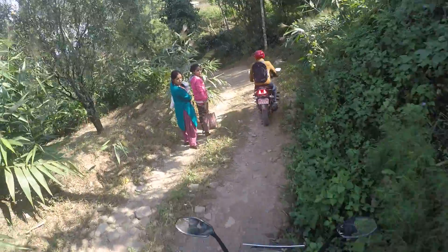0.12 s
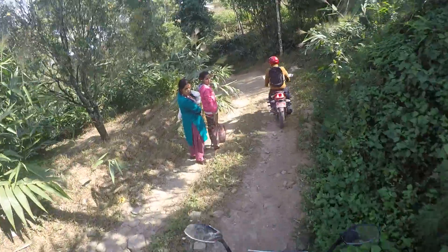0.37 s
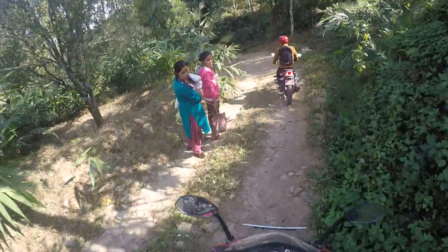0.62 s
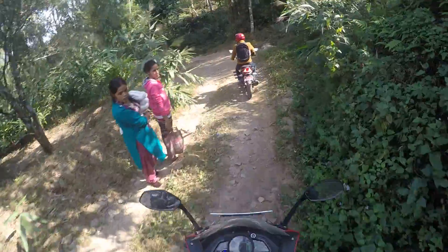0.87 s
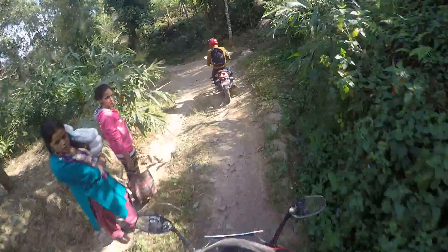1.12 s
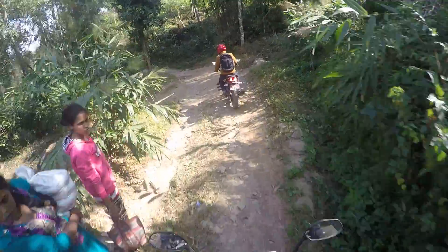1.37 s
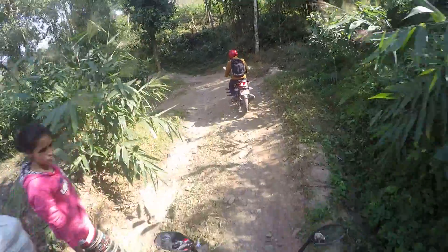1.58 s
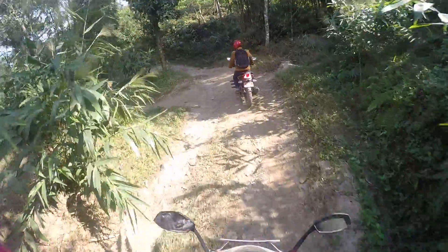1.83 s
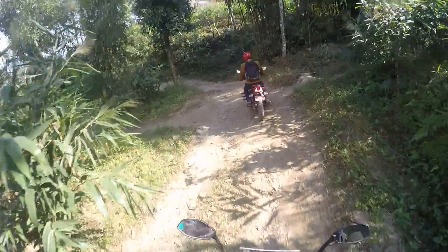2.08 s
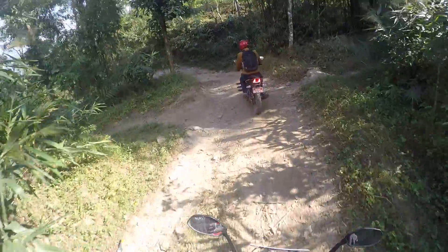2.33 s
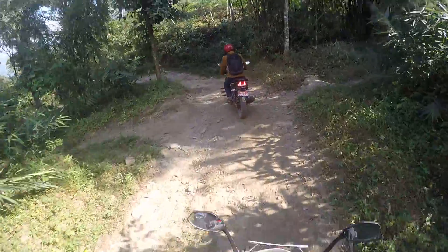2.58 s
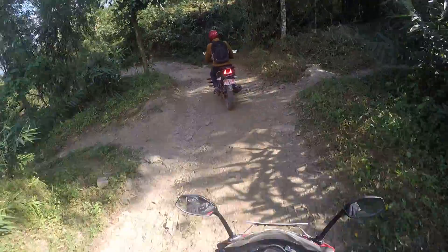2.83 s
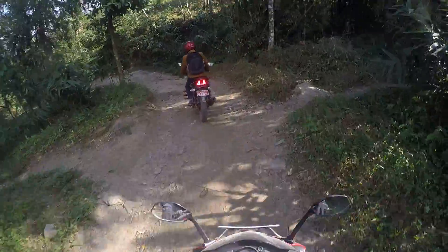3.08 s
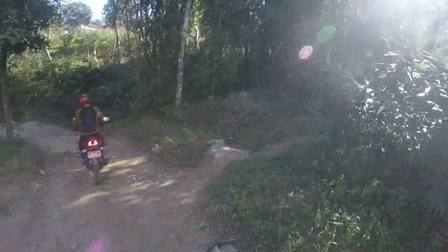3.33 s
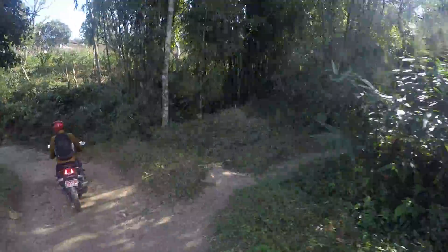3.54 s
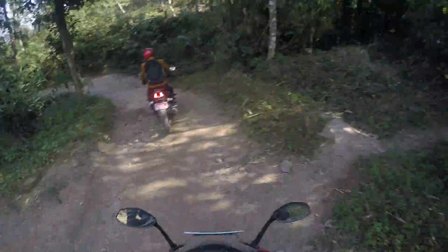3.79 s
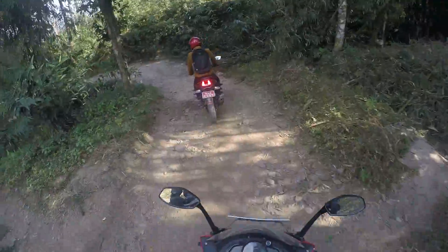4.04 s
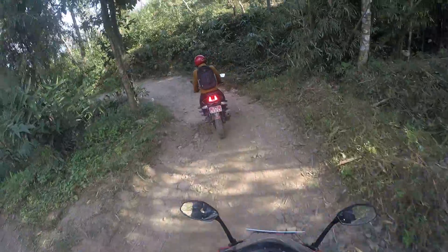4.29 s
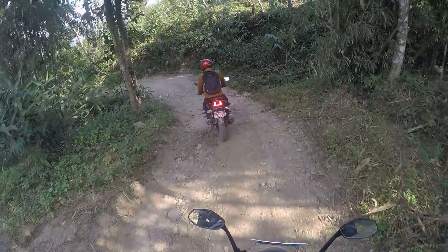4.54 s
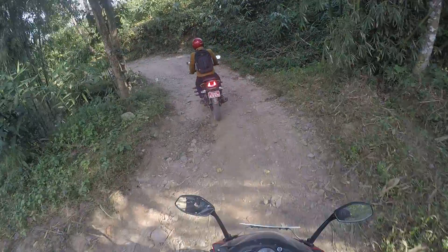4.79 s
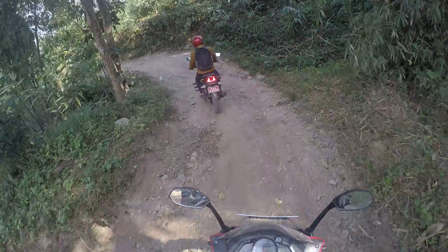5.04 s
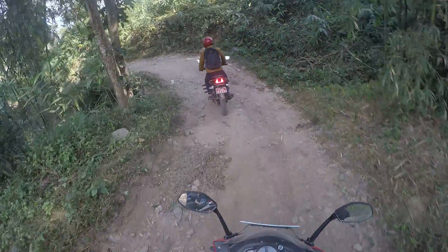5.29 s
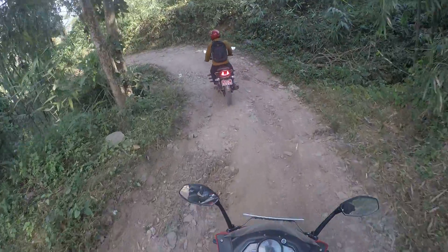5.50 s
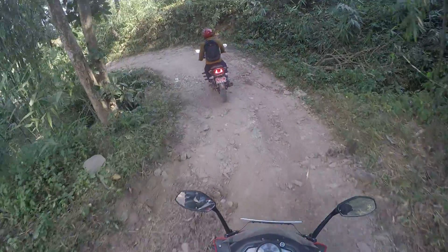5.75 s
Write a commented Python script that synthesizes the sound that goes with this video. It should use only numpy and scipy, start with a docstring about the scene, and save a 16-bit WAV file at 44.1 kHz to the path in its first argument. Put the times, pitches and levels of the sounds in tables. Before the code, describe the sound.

Heard from a slowly ridden motorcycle on a dirt track: low-frequency jolts, soft engine growl, valve ticks, brief panel hums and a few knocks.

```python
"""On a rough dirt track, a small single-cylinder motorcycle creeps along behind another one.
The microphone rides with it, sealed in a camera housing: bumps shake the mount below about 50 Hz.
The rider's engine is noise swelling on each crank turn, coloured by the housing, with ringing valve ticks.
Panels hum, thin metal sings, and things knock and scrape the housing. The exhaust some way ahead
thumps softly as pulsed pipe resonances, over microphone hiss and a faint pulsing electronic whine."""
import sys
import numpy as np
from scipy import signal
from scipy.fft import rfft, irfft
from scipy.io import wavfile

SR = 44100
rng = np.random.default_rng(int(sys.argv[2]) if len(sys.argv) > 2 else 0)


def boost_factor(decibels):
    """Convert a level in decibels to a linear amplitude factor."""
    exponent = np.asarray(decibels, float) / 20
    return 10 ** exponent


def materialize(psi):
    """Save the field psi as 16-bit PCM at rate SR to the path in sys.argv[1].

    A 1-D psi becomes a single channel; in a 2-D psi each row is a channel.
    """
    bounded = np.clip(np.atleast_2d(psi).T, -1, 1)
    quanta = np.round(bounded * 32767).astype(np.int16)
    wavfile.write(sys.argv[1], SR, quanta)


N = 259308
TIME = np.arange(N) / SR   # s

# roughness of the ground, as sway of the mount: (time [s], level [dB])
GROUND_SWAY = [(0, -31.5), (.22, -35), (.38, -32), (.75, -27), (.9, -34), (1.0, -34.5), (1.15, -20.5),
               (1.5, -28), (1.62, -32.5), (1.8, -25.5), (2.22, -22.5), (2.32, -32.5), (2.45, -28),
               (2.7, -23.5), (3.15, -24.5), (3.38, -25), (3.5, -31), (3.7, -39), (3.85, -34.5),
               (4.3, -37.5), (5.05, -39), (5.25, -44.5), (5.88, -36.5)]
# jolts from bumps, before the camera's filter: (time [s], peak [dB], swing [Hz], ringing that follows [dB])
BUMP_JOLTS = [(0.116, -23.5, 33.3, -22), (.171, -19, 33.3, -45), (.302, -18.5, 24.6, -46),
              (0.475, -5, 27.7, -16), (0.842, -19, 27.4, -48), (.94, -31.5, 28, -41),
              (1.066, -23.5, 25.2, -45), (1.184, -6.5, 26, -26), (1.348, -15.5, 27.2, -28),
              (1.519, -22.5, 30.2, -33), (1.696, -12, 28.3, -24), (1.747, -21, 26, -50),
              (1.804, -8, 22.5, -47), (1.942, -15.5, 24.7, -24.5), (2.062, -15, 28.4, -19),
              (2.2, -14, 27.8, -42), (2.527, -5.5, 23.4, -17.5), (2.655, -12.5, 24, -48),
              (2.921, -18, 23.8, -49), (3.012, -14.5, 21.7, -28.5), (3.16, -16.5, 28.7, -31),
              (3.378, -14.5, 22.8, -56), (3.802, -25.5, 29, -45), (3.921, -23, 24.2, -48),
              (4.456, -24, 23.4, -46), (4.846, -27, 22, -53), (5.146, -26.5, 30, -35),
              (5.21, -24, 22.1, -57), (5.264, -20.5, 23.3, -65), (5.511, -26.5, 24.4, -42),
              (5.564, -24, 24.2, -49), (5.614, -19.5, 20.2, -39)]
# the rider's own engine: (time [s], speed [crank turns/s])
CRANK_SPEED = [(0.0, 15.95), (0.2, 15.16), (0.6, 21.99), (1.0, 24.54), (1.4, 19.97), (1.8, 20.33),
               (2.0, 22.21), (2.4, 21.48), (2.6, 22.43), (3.0, 23.08), (3.3, 19.47), (3.8, 19.36),
               (4.1, 19.95), (4.55, 14.13), (5.0, 16.83), (5.6, 15.81), (5.9, 13.76)]
# engine load, heard as mechanical noise; its swing about the mean is used: (time [s], level [dB])
ENGINE_LOAD = [(0, -58), (.28, -57.5), (.45, -53), (.65, -52), (.9, -50.5), (1.1, -52), (1.3, -54.5),
               (1.5, -54.5), (1.95, -53.5), (2.45, -55.5), (2.8, -54), (3.2, -55), (3.6, -58.5),
               (3.92, -54.5), (4.5, -59), (5.0, -55.5), (5.4, -56.5), (5.88, -57.5)]
# resonances of the camera housing: (centre [Hz], half width [Hz], relative level [dB])
HOUSING_MODES = [(863, 25, -9.5), (1010, 71, -2), (1086, 43, 0), (1249.4, 67, 3.5), (1411, 63, 0),
                 (1630, 102, -9)]
# relative spectrum of the growl: (frequency [Hz], level [dB per Hz])
GROWL_SPECTRUM = [(76, -30), (130, -2), (161, -8.5), (232, -6.5), (341, -12), (423, -17.5), (529, -40),
                  (617, -11.5), (765, -18), (820, -35), (1070, -36), (1800, -120)]
# relative spectrum of the metal noise: (frequency [Hz], level [dB per Hz])
CLATTER_SPECTRUM = [(1060, 0.5), (1800, -2), (2030, -3.5), (2340, 4), (2550, 2), (2970, 3.5), (3180, -1),
                    (3550, 1.5), (3830, -3), (4210, 0.5), (6310, -12.5), (7020, -10), (8000, -19.5),
                    (10400, -21), (17600, -120)]
# thin metal parts sing for a moment: (time [s], half length [s], centre [Hz], level before a 2 dB cut [dB])
METAL_SINGS = [(2.85, .1, 5000, -68), (3.09, 0.079, 4300, -61), (3.24, 0.066, 4350, -68),
               (5.66, 0.41, 5040, -68), (.8, 0.19, 4200, -62), (2.78, .05, 5650, -70),
               (2.95, 0.27, 7000, -78), (3.8, .07, 4150, -68), (4.0, 0.23, 6950, -76),
               (4.2, 0.11, 4200, -65), (4.3, .15, 5020, -73), (5.0, 0.49, 4250, -70.5),
               (5.27, 0.028, 6900, -73)]
# resonances of the own exhaust pipe: (frequency [Hz], relative level [dB], t60 [s])
OWN_PIPE_MODES = [(64, 13, 0.058), (85.8, 8, 0.16), (108, 4.5, 0.1), (201, -4, 0.056), (233.7, -5, 0.18),
                  (289.6, -10, 0.26)]
# valve ticks: (time [s], level before a 5.5 dB cut [dB], even turns over odd [dB], 3 kHz over the rest [dB])
TICK_LEVELS = [(0, -67, -3, 3), (.27, -69, 0, 2), (.32, -61, 0, 4), (.47, -59, 0, 2), (.55, -58.5, 0, -2),
               (.9, -57.5, -2, -1), (1.05, -68, 0, -2), (1.32, -64, 3, 0), (1.6, -66, -5, 0),
               (2.0, -65, 0, 0), (2.5, -70, -3, -2), (3.2, -63, -2, 0), (3.6, -69, -5, 0),
               (3.95, -62, -3, -1), (4.12, -65, 1, -2), (4.3, -62, 4, 0), (4.9, -63, 5, 0),
               (5.15, -65, 3, -1), (5.35, -62, 4, 1), (5.6, -63, 2, 0), (5.88, -61.5, 0, 0)]
# single ticks that land harder: (time [s], extra level [dB])
HARDER_TICKS = [(3.22, 4), (4.695, 2), (5.312, 4)]
# valve gear: (frequency [Hz], relative level [dB], t60 of one pass [s])
VALVE_MODES = [(1245, -6, .03), (2380, -7, .014), (2720, -5, .014), (3000, 0, .018), (3380, -7, .011),
               (4160, -7, .011), (5070, -10, .013), (5750, -14, .014), (6900, -19, .012)]
# a panel hums at certain moments: (start [s], length [s], start pitch [Hz], end pitch [Hz], nominal level [dB])
PANEL_HUMS = [(0.529, 0.3, 1010, 1044, -50.5), (0.857, 0.2, 1037, 1015, -58.5),
              (1.795, 0.18, 1028, 1040, -47), (2.173, 0.14, 1000, 1001, -49.5),
              (2.44, 0.25, 1244, 1246, -49.5), (2.462, 0.28, 987, 1010, -47.5),
              (2.793, 0.049, 1043, 1014, -41.5), (2.896, 0.034, 1047, 1020, -54),
              (0.238, 0.12, 1273, 1294, -53), (0.402, .05, 1257, 1250, -56),
              (0.535, 0.089, 1285, 1260, -54), (.8, 0.035, 1243, 1235, -54),
              (0.888, 0.092, 1222, 1240, -47), (0.926, 0.076, 1427, 1415, -54.5),
              (3.06, 0.039, 1240, 1252, -53)]
# something strikes the housing: (time [s], peak [dB], contact [s], second touch after [s])
HOUSING_KNOCKS = [(1.324, -36, 0.0002, 0.00315), (3.967, -49, 0.00029, 0.00305),
                  (4.696, -41, 0.00044, 0.00364), (4.897, -17, 0.001, 0.004875),
                  (4.983, -43, 0.00022, 0.0034)]
# the struck housing: (frequency [Hz], relative level [dB], t60 [s])
SHELL_MODES = [(458, -16, 0.012), (670, -15, 0.014), (702, -15, 0.096), (972, 3.5, 0.022), (1101, 7, 0.042),
               (1285, 5.5, 0.016), (1620, 3, 0.014), (2350, 3, 0.012), (4200, -42, .01)]
# the engine ahead: (time [s], firing rate [firings/s])
AHEAD_FIRINGS = [(0.0, 13.82), (0.5, 13.46), (1.0, 13.11), (1.5, 12.81), (2.0, 12.65), (2.5, 12.77),
                 (3.0, 13.37), (3.5, 14.22), (4.0, 14.13), (4.5, 13.4), (5.0, 14.03), (5.5, 14.48),
                 (6.0, 13.66)]
# exhaust ahead, nearer or under more throttle: (time [s], level of its thumps [dB])
AHEAD_LEVELS = [(0, -58.5), (.45, -43.5), (.56, -46), (.75, -59), (1.02, -50), (1.1, -66), (1.3, -46),
                (1.6, -54), (2.4, -53.5), (2.7, -45), (3.4, -48), (4.15, -51.5), (4.85, -49.5), (5.15, -50),
                (5.88, -54)]
# resonances of the exhaust pipe ahead: (frequency [Hz], relative level [dB], t60 [s])
AHEAD_PIPE_MODES = [(66.6, -1.2, 0.19), (81.3, -0.93, 0.25), (110, -0.32, 0.16)]
# relative spectrum of the microphone hiss: (frequency [Hz], level [dB])
HISS_SPECTRUM = [(3530, -50), (6000, -18), (6970, -9), (9260, -13), (10600, -11.5), (10800, -12.5),
                 (13400, -13.5), (15000, -16.5)]
# whine of the camera electronics: (frequency [Hz], rms level [dB])
WHINE_TONES = [(10261.72, -87), (10285.7, -85.5), (10309.68, -91), (10357.64, -97)]


def rms_one(x):
    """Scales a signal to rms 1."""
    return x / np.sqrt(np.mean(x ** 2) + 1e-20)


def in_time(rows):
    """Draws each column of a time table as a line over all samples."""
    s, *columns = np.transpose(rows)
    return [np.interp(TIME, s, column) for column in columns]


def coloured(gain_at):
    """White noise shaped by a gain for each frequency; rms 1."""
    hz = np.arange(1, N // 2 + 2) * SR / N
    return rms_one(irfft(rfft(rng.standard_normal(N)) * gain_at(hz), N))


def spectrum(points):
    """Gain that joins the points of a spectrum on a log frequency axis."""
    hz, level_db = np.transpose(points)
    return lambda f: boost_factor(np.interp(np.log(f), np.log(hz), level_db))


def peak(hz, half_width):
    """Gain of a resonance passed twice: steep flanks, 6 dB down at the half width."""
    return lambda f: 1 / (1 + ((f - hz) / half_width) ** 2)


def drift(rate_hz):
    """Random wander below roughly the given rate; rms 1."""
    return coloured(peak(0, rate_hz))


def ring(x, modes):
    """Every mode rings after the excitation, neighbours in opposite sign."""
    out = 0
    for k, (hz, level_db, t60) in enumerate(modes):
        radius = boost_factor(-60 / (t60 * SR))
        w = 2 * np.pi * hz / SR
        resonator = [1, -2 * radius * np.cos(w), radius * radius]
        out = out + (-1) ** k * boost_factor(level_db) * signal.lfilter([0, np.sin(w)], resonator, x + 1e-18)
    return out


def turns(rate_table, start):
    """Running count of turns, begun a fraction of a turn in."""
    return start + np.cumsum(in_time(rate_table)[0]) / SR


def once_per_turn(turn, spread_db):
    """A click at every whole turn, each with its own strength."""
    whole = np.floor(turn).astype(int)
    strength = boost_factor(spread_db * rng.standard_normal(200))
    return np.diff(whole, prepend=whole[0]) * strength[whole]


def level_by_engine(level_db, load_share, db_per_turn):
    """Gain from a level at mean load and 19.5 turns/s, a share of the load's swing and dB per extra turn/s."""
    load_db, = in_time(ENGINE_LOAD)
    load_swing_db = load_share * (load_db - load_db.mean())
    return boost_factor(level_db + load_swing_db + db_per_turn * (in_time(CRANK_SPEED)[0] - 19.5))


def swell_and_fade(start, length):
    """Envelope that rises exponentially over 40 ms, holds, and fades over 30 ms."""
    rise = np.minimum(TIME - start, 0) / 0.04
    fade = np.maximum(TIME - start - length, 0) / 0.03
    return np.exp(rise - fade)


def mount():
    """Bumps pull the membrane back in one short swing and leave the mount ringing; between them it sways."""
    ground_db, = in_time(GROUND_SWAY)
    # ringing between jolts follows 0.71 of the ground's swing
    ringing = boost_factor(-37.5 + 0.71 * (ground_db - ground_db.mean()))
    rise_s, fall_s = 0.05, 0.11
    for s, _, _, ring_db in BUMP_JOLTS:
        after = np.clip(TIME - s, 0, 9)
        ringing = ringing + boost_factor(ring_db) * (1 - np.exp(-after / rise_s)) * np.exp(-(after / fall_s) ** 2)
    sway = coloured(lambda f: peak(19, 11)(f) ** 2 * f / (f + 1.8))
    out = boost_factor(ground_db + 2 * drift(2.8)) * sway
    out += ringing * coloured(lambda f: peak(41, 7.0)(f) / (1 + (f / 54) ** 14))
    for s, level_db, hz, _ in BUMP_JOLTS:
        bell = np.exp(-((TIME - s) * hz / 0.55) ** 2)
        swing = boost_factor(level_db) * np.cos(2 * np.pi * hz * (TIME - s))
        out = out * (1 - bell) - bell * swing   # the jolt takes over the motion
    # a steep edge: the camera's filter passes little of the shaking above 56 Hz
    camera_filter = signal.butter(8, 56, fs=SR, output="sos")
    return signal.sosfiltfilt(camera_filter, out)


def housing_roar():
    """Engine noise in the housing's resonances, each coming and going on its own; rms 1."""
    out = 0
    for hz, half_width, level_db in HOUSING_MODES:
        level = boost_factor(level_db + 0.96 * drift(5.4) + 1.18 * drift(36))
        out = out + level * np.sqrt(half_width) * coloured(peak(hz, half_width))
    return rms_one(out)


def engine(turn):
    """Noise that swells on each crank turn, heard as growl, housing roar, intake drone and clatter."""
    swell = np.cos(2 * np.pi * (turn - .1))
    shared = drift(13.0)   # roar, growl and metal noise waver together
    roar_db = 1.0 * swell + 0.12 * shared + 0.86 * drift(27)
    out = housing_roar() * level_by_engine(-49, 0.63, 0.059) * boost_factor(roar_db)
    growl_db = 0.42 * swell + 1.6 * shared + 0.43 * drift(3.4)
    out += coloured(spectrum(GROWL_SPECTRUM)) * level_by_engine(-60, 0.16, 0.2) * boost_factor(growl_db)

    # the intake booms once over its drone
    gulp = boost_factor(-62) * np.exp(-((TIME - 2.63) / 0.065) ** 2)
    drone = level_by_engine(-69.5, 0.2, 0.65) * boost_factor(1.0 * drift(2.4))
    out += coloured(peak(426.0, 53)) * boost_factor(3.6 * swell) * (drone + gulp)

    # metal noise divides near 3.8 kHz into clatter below and sizzle above
    metal = spectrum(CLATTER_SPECTRUM)
    upper = lambda f: 1 / (1 + (3800 / f) ** 12)
    clatter = coloured(lambda f: metal(f) * np.sqrt(1 - upper(f)))
    sizzle = coloured(lambda f: metal(f) * np.sqrt(upper(f)))
    flicker_db = 0.5 * np.cos(4 * np.pi * (turn + .02)) + 0.73 * shared
    out += clatter * level_by_engine(-58, 0.75, 0.011) * boost_factor(flicker_db + 1.64 * drift(34))
    out += sizzle * level_by_engine(-63, 0.89, 0.036) * boost_factor(flicker_db + 1.0 * drift(40))
    fins = coloured(peak(5070, 90))
    return out + fins * level_by_engine(-88.5, .4, .1) * boost_factor(4.0 * np.cos(2 * np.pi * turn))


def own_exhaust(turn):
    """One pulse per crank turn sets the own exhaust pipe ringing."""
    thumps = rms_one(ring(once_per_turn(turn - .3, spread_db=1.2), OWN_PIPE_MODES))
    return level_by_engine(-56, 1, 0.19) * thumps


def valve_ticks(turn):
    """Valve parts are struck on every turn, a little apart, and ring; the ticks wax and wane."""
    tick_db, even_db, ping_db = in_time(TICK_LEVELS)
    for s, extra_db in HARDER_TICKS:
        tick_db = tick_db + extra_db * (np.abs(TIME - s) < .025)
    ticks = 0
    for hz, level_db, t60 in VALVE_MODES:
        touches = once_per_turn(turn + .08 + .035 * drift(12), spread_db=1.0)
        even_odd_db = even_db * (-1) ** np.floor(turn + .5) / 2
        accent = boost_factor(level_db + even_odd_db + ping_db * (level_db == 0))   # the 3 kHz part stands at 0 dB
        mode = [(hz, 0, t60)]
        tick = ring(ring(touches, mode), mode)   # passed twice: swells for a few ms, then dies
        rattle = 1.8 + drift(260)                # loose parts rattle
        ticks = ticks + accent * rms_one(tick * rattle)
    return boost_factor(tick_db - 5.5) * ticks


def panel(turn):
    """A rough gliding tone, pushed once per crank turn; it swells, holds and fades."""
    out = np.zeros(N)
    push = boost_factor(2.0 * np.cos(2 * np.pi * (turn - .15)))
    for s, length, start_hz, end_hz, level_db in PANEL_HUMS:
        pitch = np.interp(TIME, [s, s + length], [start_hz, end_hz])
        phase = 2 * np.pi * np.cumsum(pitch) / SR
        tone = (.6 + .45 * drift(55)) * np.sin(phase) + .62 * drift(55) * np.cos(phase)
        out += swell_and_fade(s, length) * boost_factor(level_db) * push * tone
    return out


def exhaust_boom():
    """The exhaust pipe booms once: a nearly steady 114 Hz note and its wavering octave swell and fade."""
    phase = 2 * np.pi * 114 * TIME + .5 * drift(11.0)
    note = boost_factor(-45.5) * np.sin(phase)
    octave = boost_factor(-52.5 + 2.2 * drift(11)) * np.sin(2 * phase)
    return swell_and_fade(.71, .13) * (note + octave)


def singing_metal(turn):
    """Thin metal parts sing as narrow noise, shaken twice a turn."""
    out = np.zeros(N)
    shaken_db = 4 * np.cos(4 * np.pi * (turn + .02))
    for s, half, hz, level_db in METAL_SINGS:
        moment = np.exp(-((TIME - s) / half) ** 2)
        out += boost_factor(level_db - 2.0 + shaken_db) * moment * coloured(peak(hz, 120))
    return out


def knocks():
    """A rounded contact and a weaker bounce strike the housing; short contacts reach the high modes."""
    out = np.zeros(N)
    for s, level_db, contact, bounce in HOUSING_KNOCKS:
        force = np.zeros(N)
        push = np.hanning(int(contact * SR) + 3)
        for delay, size in ((0, 1), (bounce, .6)):
            at = int((s + delay) * SR)
            force[at:at + len(push)] += size * push
        sound = ring(force, SHELL_MODES)
        out -= boost_factor(level_db) * sound / np.abs(sound).max()
    return out


def twig_whip():
    """A twig whips along the housing: a short rough scrape cracks and rings the shell and a hollow note."""
    start_s, length_s = 1.316, .013
    part = (TIME - start_s) / length_s
    envelope = np.clip(part / 0.11, 0, 1) * np.exp(-np.clip(part, 0, 9) ** 2)
    scrape = envelope * coloured(peak(0, 5000))
    band = signal.butter(4, [1800, 7500], "band", fs=SR, output="sos")
    crack = signal.sosfilt(band, scrape)
    hollow = ring(np.diff(np.clip(part * 20, 0, 1), prepend=0), [(587, 0, .07)])
    layers = (-35, ring(scrape, SHELL_MODES)), (-42, crack), (-42.5, hollow)   # (peak [dB], sound)
    return sum(boost_factor(level_db) * sound / np.abs(sound).max() for level_db, sound in layers)


def exhaust_ahead():
    """Firing pulses ring the exhaust pipe ahead, over a low noise hum in the same resonances."""
    firings = once_per_turn(turns(AHEAD_FIRINGS, .96 + 0.1185), spread_db=2.0)
    thumps = rms_one(ring(firings, AHEAD_PIPE_MODES))
    hum = boost_factor(-5.5) * rms_one(ring(rng.standard_normal(N), AHEAD_PIPE_MODES))
    return boost_factor(in_time(AHEAD_LEVELS)[0]) * (thumps + hum)   # both rise and fall together


def camera():
    """Microphone hiss as shaped noise, and a faint whine of close sines that pulses about 24 times a second."""
    whine = sum(np.sqrt(2) * boost_factor(level_db) * np.sin(2 * np.pi * hz * TIME) for hz, level_db in WHINE_TONES)
    return boost_factor(-72.5) * coloured(spectrum(HISS_SPECTRUM)) + whine


def scene():
    """Adds all sources at the one microphone; engine layers share one crank."""
    turn = turns(CRANK_SPEED, .838)
    mix = mount() + engine(turn) + own_exhaust(turn) + valve_ticks(turn)
    mix += panel(turn) + exhaust_boom() + singing_metal(turn)
    mix += knocks() + twig_whip() + exhaust_ahead() + camera()
    return mix[None]


def band_limit(x):
    """A steep low-pass at the top of the band."""
    return signal.sosfilt(signal.butter(12, 15170, fs=SR, output="sos"), x)


def record(dry):
    """Takes the finished mix down as the camera's sound track."""
    return band_limit(dry)


dry = scene()
out = record(dry)
materialize(out)
```